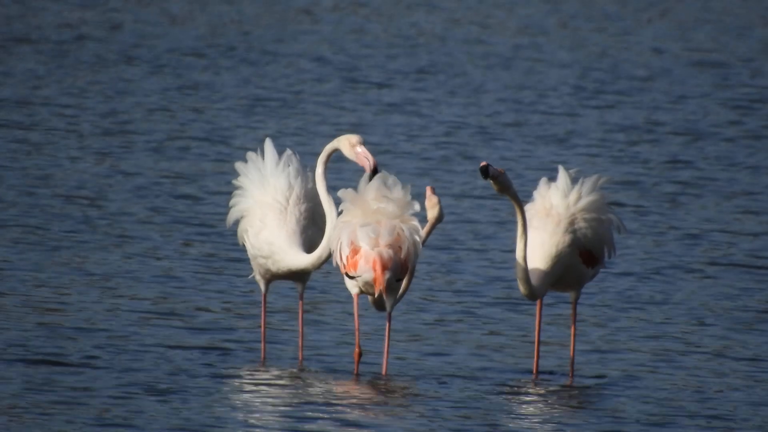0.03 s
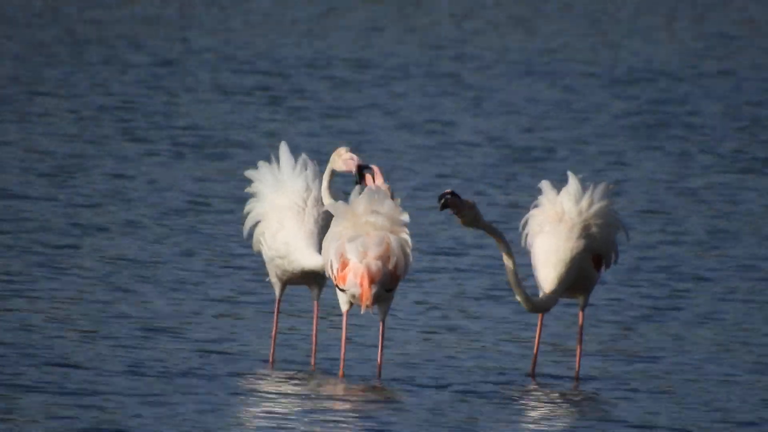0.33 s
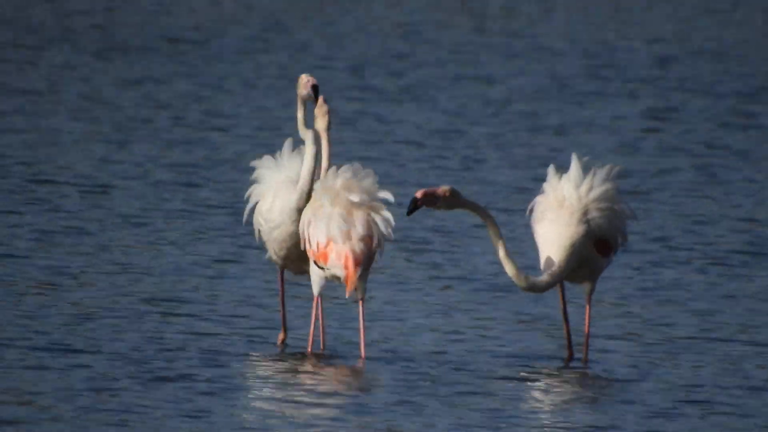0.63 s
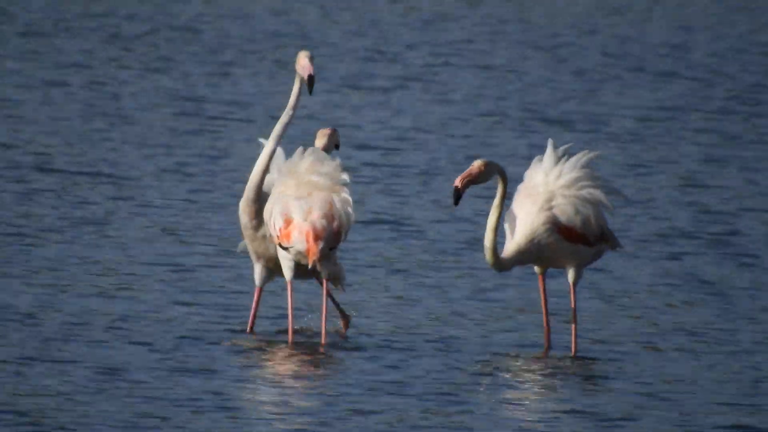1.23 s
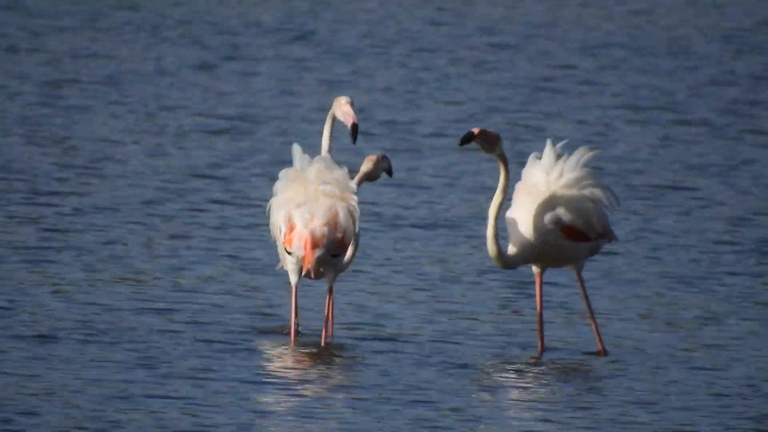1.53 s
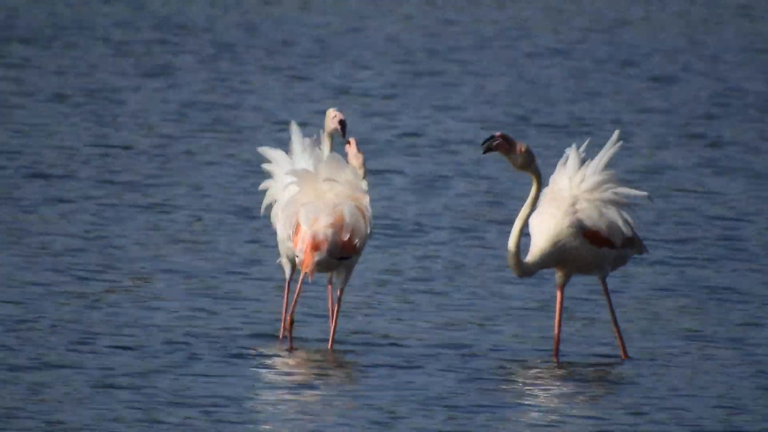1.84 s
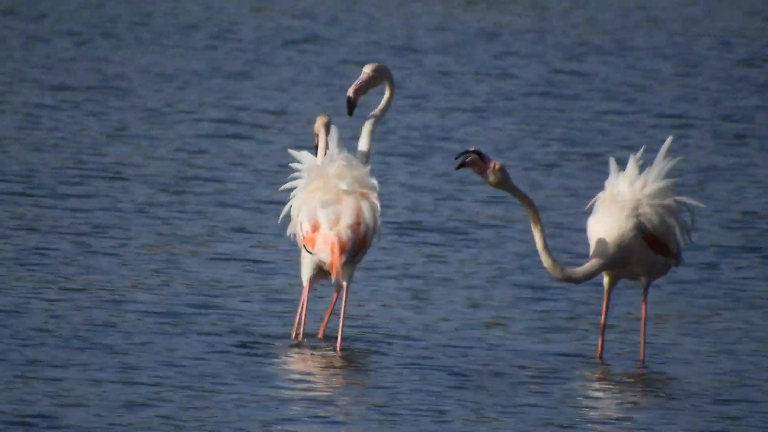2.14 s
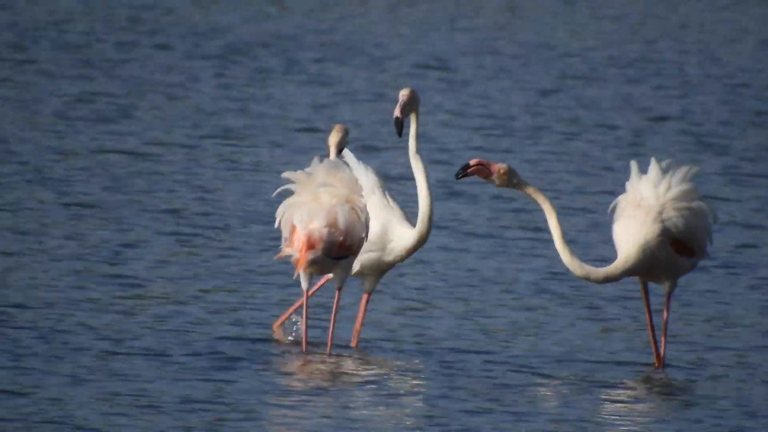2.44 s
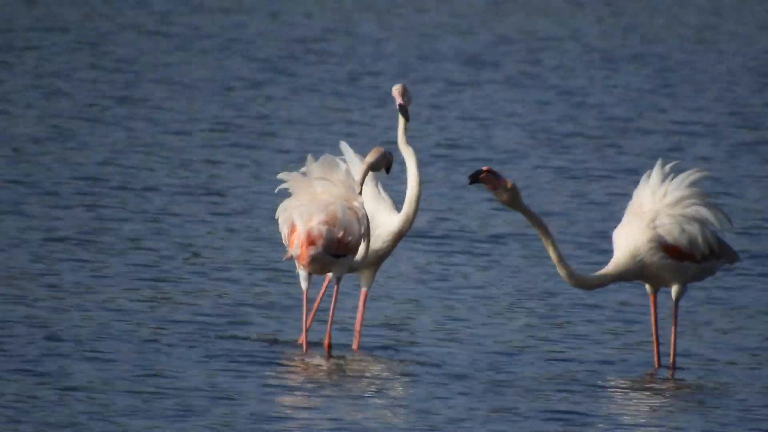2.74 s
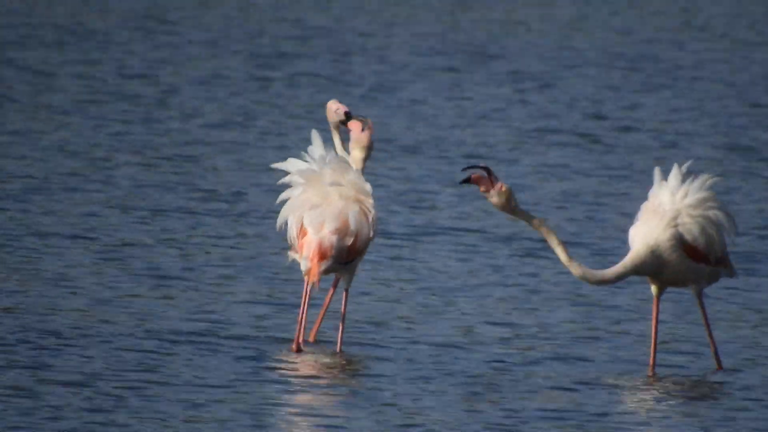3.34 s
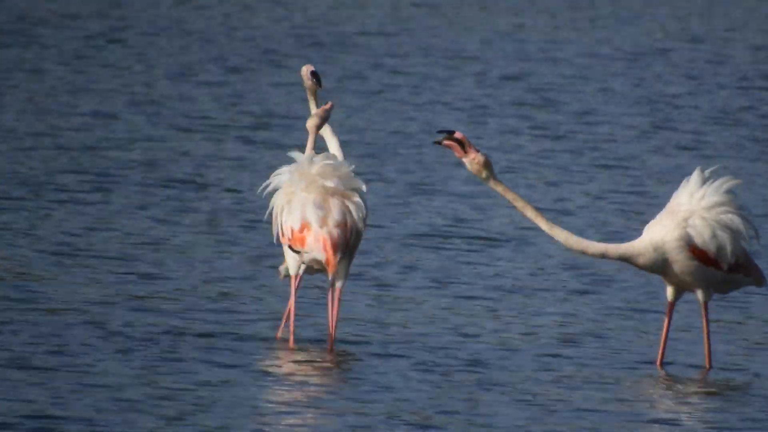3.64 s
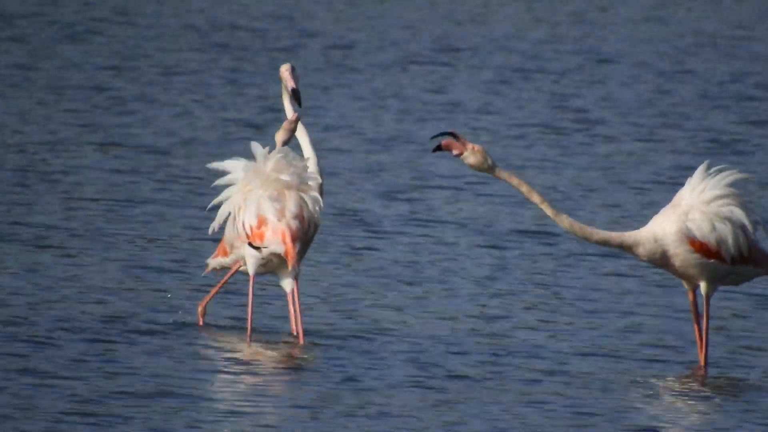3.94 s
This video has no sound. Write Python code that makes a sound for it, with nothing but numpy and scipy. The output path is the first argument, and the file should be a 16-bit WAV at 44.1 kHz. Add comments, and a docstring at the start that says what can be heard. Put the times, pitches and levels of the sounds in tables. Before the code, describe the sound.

Harsh, overlapping flamingo honks run throughout, with a nasal bray at first and a buzzing growl later, then a faint, distant bird whistle. Shallow water washes softly while low wind rumbles on the microphone.

```python
"""Flamingos squabbling in a lagoon

Each honk is a short train of raspy air puffs exciting the resonances of the throat. A nasal bray
comes early in the quarrel, and one bird later holds a long, buzzing growl. A small bird whistles
far off. Low wind bumps the microphone over a soft wash of shallow water."""
import sys
import numpy as np
from scipy import signal
from scipy.fft import rfft, irfft, next_fast_len
from scipy.io import wavfile
from scipy.ndimage import map_coordinates

SR = 44100
rng = np.random.default_rng(int(sys.argv[2]) if len(sys.argv) > 2 else 0)


def bounce(signal):
    """Save signal as a 16-bit WAV file at the path given by the first command-line argument."""
    frames = np.transpose(np.atleast_2d(signal))
    limited = np.clip(frames, -1, 1)
    pcm = np.round(limited * 32767).astype(np.int16)
    wavfile.write(sys.argv[1], SR, pcm)


N = 176400
T = np.arange(N) / SR

# Each row: centre of a honk in seconds, length in seconds, puffs per second, first, second and rasp
# resonance in Hz, then relative levels in dB of the first, second, third, rasp and hiss bands.
HONK_CALLS = [(0.109, 0.084, 77, 1173, 2400, 4440, -45.5, -60, -57, -60, -50),
              (0.174, 0.16, 72.75, 1040, 2020, 3700, -47.5, -58.5, -70, -59.5, -65),
              (0.391, 0.028, 77, 1160, 2540, 5100, -55.5, -58.5, -69, -79, -78),
              (0.528, 0.14, 86.6, 1045, 2147, 3900, -48, -56.5, -62.5, -63, -61),
              (0.624, 0.083, 88, 1145, 2120, 4040, -52, -59, -69, -78, -73),
              (0.761, 0.075, 73.4, 1037, 2160, 4920, -48.5, -54.5, -54, -56.5, -59.5),
              (0.866, 0.13, 84.6, 1050, 1970, 4530, -46.5, -57, -65.5, -61, -64.5),
              (0.99, 0.092, 94.1, 1090, 2100, 5200, -55, -60, -75, -78, -76),
              (1.192, 0.11, 73.8, 1050, 2200, 4560, -43.5, -56, -54.5, -46.5, -55),
              (1.376, 0.057, 72.7, 1220, 2520, 3900, -54, -61, -53, -71, -76),
              (1.444, 0.099, 74.4, 1080, 2170, 4330, -44.5, -58, -68, -47.5, -56.5),
              (1.607, 0.12, 78.4, 1050, 1940, 4530, -50.5, -55.5, -65, -62.5, -65),
              (1.726, 0.1, 88.7, 1033, 2160, 4780, -45.5, -50, -63, -45, -54.5),
              (1.919, 0.077, 85.3, 1008, 2030, 3730, -49, -57, -62, -66, -59.5),
              (2.033, 0.135, 90.2, 1048, 2135, 4860, -43.5, -48.5, -56.5, -54.5, -56.5),
              (2.13, 0.1, 103.6, 1120, 2260, 4450, -49.5, -69, -72, -84, -81.5),
              (2.209, 0.13, 79, 1082, 1940, 4400, -45, -60, -62.5, -56, -56.5),
              (2.367, 0.14, 70.5, 1016, 2160, 5070, -52.5, -71, -70, -53.5, -54),
              (2.569, 0.11, 84.5, 1060, 2040, 4520, -44.5, -50, -60, -57, -57),
              (2.851, 0.084, 70.9, 1054, 2200, 4670, -49, -57, -65, -57, -57.5),
              (2.929, 0.09, 70.5, 1065, 2020, 3700, -52, -54, -65, -73, -63.5),
              (2.972, 0.12, 70.95, 1123, 1980, 3700, -49, -61, -56.5, -67, -63.5),
              (3.09, 0.087, 71.2, 1097, 2350, 4830, -50.5, -64, -59, -51.5, -53.5),
              (3.26, 0.1, 83.9, 1290, 2480, 4320, -48.5, -64, -57.5, -57, -59.5),
              (3.346, 0.086, 76.4, 1064, 2180, 4740, -46.5, -51.5, -56.5, -51.5, -53.5),
              (3.59, 0.12, 78, 1072, 2110, 4060, -46.5, -56, -56, -55, -53.5),
              (3.833, 0.13, 94, 1070, 2010, 4240, -43.5, -51.5, -58.5, -58, -57.5)]
# Clusters about the first and the rasp resonance. Each row: frequency ratio, width in Hz, gain in dB.
THROAT_MODES = [(0.92, 194, 16.5), (1.11, 265, 4), (1.33, 420, -7.5)]
RASP_MODES = [(.85, 704, 2), (1.01, 1090, 8.5), (1.24, 720, -2)]
# Stationary resonances of the calls. Each row: centre in Hz, width in Hz, gain in dB.
HISS_MODES = [(5870, 680, -5.5), (6950, 1150, 4.5), (8280, 1830, -1), (9800, 2400, -19)]
BRAY_THROAT_MODES = [(950, 300, -12.5), (1187, 230, 0.5), (1950, 88, -13.5), (2350, 470, -12.5),
                     (2910, 300, -14)]
BRAY_BILL_MODES = [(4330, 670, -3), (5580, 550, 1), (6950, 800, 0.5), (8730, 2000, -5.5)]
GROWL_THROAT_MODES = [(956, 270, -1), (1290, 360, -1.5), (1470, 94, -9)]
GROWL_BUZZ_MODES = [(4570, 670, -0.5), (3920, 1300, -14)]
# Envelopes of the bray. Each row: time in seconds, throat level in dB, bill level in dB.
BRAY_ENVELOPE = [(.208, -50, -69), (.225, -43.5, -54), (.275, -42.5, -47.5), (.318, -44.5, -46.5),
                 (.342, -49, -56)]
# Envelopes of the growl, its buzz and the wind. Each row: time in seconds, relative level in dB.
GROWL_ENVELOPE = [(3.111, -42), (3.19, -39.5), (3.25, -37.5), (3.31, -37), (3.39, -40.5), (3.46, -37.5),
                  (3.515, -42.5), (3.58, -40)]
BUZZ_ENVELOPE = [(3.12, -5), (3.26, -3.5), (3.42, 1.5), (3.515, 3), (3.535, -11)]
WIND_ENVELOPE = [(.1, -47), (.8, -47), (1.3, -45.5), (1.65, -45.5), (1.9, -47), (2.35, -46), (2.8, -48),
                 (4, -48.3)]
# The small bird. Each row: start in seconds, length in seconds, first and last pitch in Hz, level in dB.
WHISTLE_NOTES = [(3.629, 0.074, 4400, 4130, -60), (3.769, 0.055, 4170, 3760, -51.5)]
# Wind buffets. Each row: centre and half length in seconds, frequency in Hz, relative level in dB.
WIND_BUMPS = [(0.478, 0.022, 54.7, -36), (1.015, 0.021, 68, -36.5), (1.265, 0.023, 131, -32.5),
              (1.281, 0.043, 64.5, -36.5), (1.534, 0.014, 56, -32), (1.637, 0.021, 69, -34),
              (2.345, 0.015, 68, -34)]
# Water stirred by legs. Each row: centre and half length in seconds, level in dB.
WADING_SLOSHES = [(.63, 0.08, -52.5)]
# Noise spectra. Each row: frequency in Hz, relative level in dB.
WIND_SPECTRUM = [(20, 2.5), (35, -5.5), (65, 1), (100, -1.5), (150, -5), (205, -5), (260, -31.5),
                 (400, -28), (900, -73)]
WATER_SPECTRUM = [(100, 9.5), (260, 3), (500, 1), (800, -0.5), (1400, -2.5), (2200, -5.5), (3200, -8),
                  (4800, -6), (7000, -9.5), (9000, -9.5), (11000, -15.5), (15500, -19)]
# Likeness of left and right. Each row: frequency in Hz, correlation.
WIND_COHERENCE = [(30, 1), (100, 0.95), (220, 0.78)]
WATER_COHERENCE = [(200, 0.56), (1000, 0.5), (4000, 0.1), (12000, 0.033)]

PUFF_SAMPLES, SCATTER_DB = 1024, 1.35  # scatter is the random spread of puff strength
THROAT_DECAY_S, RASP_DECAY_S, HISS_DECAY_S = .0048, .0024, .002
EASY_JITTER_S, FORCED_JITTER_S = .00007, .00022  # spread of puff timing at low and at full effort
EASY_NOISE, FORCED_NOISE = .16, .28  # turbulent share of the energy driving the throat


def honk(t, length, rate, first_hz, second_hz, rasp_hz, levels_db):
    """Source and filter: puffs around t = 0 ring the throat, which sags and roughens with effort."""
    index = np.arange(-9, 10)
    jitter, scatter, edge, waver, accent, twang, stumble = rng.standard_normal((7, len(index)))
    effort = np.interp(levels_db[0], (-48.5, -44), (0, 1))
    noise = np.interp(effort, (0, 1), (EASY_NOISE, FORCED_NOISE))
    times = index / rate * (1 + .45 * effort * index / rate)  # effort slows the puffs as they go
    times += np.interp(effort, (0, 1), (EASY_JITTER_S, FORCED_JITTER_S)) * jitter
    when, starts = times[:, None], times - t[0]

    def swell(lag_s, edge_db, shape):
        """Puff amplitudes peak at lag_s and fall by edge_db half a length away."""
        fall_db = edge_db * np.abs(2 * (times - lag_s) / length) ** shape
        return amp(np.maximum(SCATTER_DB * scatter - fall_db, -120))

    drift = .014 * waver[:, None]
    first = first_hz * np.exp(drift - 1.5 * effort * when)
    second = second_hz * np.exp(drift - .45 * effort * when)
    rasp = rasp_hz * np.exp(2.4 * np.minimum(when + .0082, 0))  # climbs as the bill opens
    throat_modes = [(first * ratio, width, db) for ratio, width, db in THROAT_MODES]
    rasp_modes = [(rasp * ratio, width, db) for ratio, width, db in RASP_MODES]
    overtones = swell(lag_s=-.0054, edge_db=20.5, shape=3.04)
    first_puffs = with_after_snaps(starts - .003, swell(-.004, 15.5, 2.9), stumble)
    second_puffs = with_after_snaps(starts - .002, amp(SCATTER_DB * accent) * overtones, stumble)
    # Rasp and hiss puffs are more uneven, and lengthen as they sink under the first band.
    bite = amp(3 * edge)
    blur = 1.48 + .7 * np.clip((levels_db[0] - max(levels_db[3:])) / 14, 0, 1)
    bands = [  # first, second, third, rasp, hiss
        (*first_puffs, throat_modes, THROAT_DECAY_S, noise),
        (*second_puffs, [(second, 380, 0)], THROAT_DECAY_S, noise),
        (starts - .0008, amp(SCATTER_DB * twang) * overtones, [(2857, 700, 0)], .004, 3 * noise),
        (starts - .0003, bite * swell(.002, 16.5, 1.9), rasp_modes, blur * RASP_DECAY_S, .92),
        (starts, bite * swell(.0064, 19, 1.9), HISS_MODES, blur * HISS_DECAY_S, .75)]
    voice = sum(amp(db) * puff_train(*band, samples=len(t)) for db, band in zip(levels_db, bands))
    return voice * np.sqrt(length * SR / len(t))


def honks():
    """Superposition: the overlapping honks of the flock add."""
    flock = np.zeros(N)
    for centre, length, rate, first_hz, second_hz, rasp_hz, *levels_db in HONK_CALLS:
        near = np.abs(T - centre) < .12
        flock[near] += honk(T[near] - centre, length, rate, first_hz, second_hz, rasp_hz, levels_db)
    return amp(.2) * flock


def with_after_snaps(starts, sizes, stumble, delay_s=.0045, jitter_s=.0005):
    """Double pulsing: a weaker, less punctual snap follows each puff of the throat."""
    return np.r_[starts, starts + delay_s + jitter_s * stumble], np.r_[sizes, amp(-5) * sizes]


def puff_train(starts, sizes, modes, decay_s, noise_share, samples=N):
    """Impulse excitation: each puff, a snap plus turbulence, rings the modes. The train has rms 1."""
    t = np.arange(PUFF_SAMPLES) / SR - .006
    envelope = np.where(t < 0, np.exp(-(t / decay_s) ** 2), np.exp(-np.abs(t) / decay_s))
    turbulence = unit(envelope * rng.standard_normal((len(starts), PUFF_SAMPLES)))
    snap = unit(signal.unit_impulse(PUFF_SAMPLES, np.argmin(np.abs(t))))
    drive = rfft(np.sqrt(noise_share) * turbulence + np.sqrt(1 - noise_share) * snap)
    puffs = irfft(drive * np.resize(resonances(modes), drive.shape))
    puffs *= (sizes / np.linalg.norm(puffs, axis=1))[:, None]
    onsets = np.round((starts[:, None] + t[0]) * SR).astype(int)
    positions = np.clip(onsets + np.arange(PUFF_SAMPLES), 0, samples)
    return unit(np.bincount(positions.ravel(), puffs.ravel(), samples + 1)[:samples])


def resonances(modes):
    """Steep parallel resonators, given minimum phase so that ringing follows its cause."""
    f = np.fft.rfftfreq(PUFF_SAMPLES, 1 / SR)
    gain = sum(amp(db) * (f * width / np.hypot(hz * hz - f * f, f * width)) ** 3
               for hz, width, db in modes)
    cepstrum = irfft(np.log(gain + 1e-3))
    lag = np.arange(PUFF_SAMPLES)
    causal_fold = np.where(lag < PUFF_SAMPLES // 2, 2 - (lag == 0), 0)
    return np.exp(rfft(cepstrum * causal_fold))


def bray(puff_hz=103.6):
    """Periodic excitation: even puffs voice a nasal call, which brightens as the opening bill rings."""
    knots, throat_db, bill_db = np.transpose(BRAY_ENVELOPE)
    times = np.arange(knots[0], knots[-1], 1 / puff_hz)
    jitter, scatter = rng.standard_normal((len(times), 2)).T
    times += EASY_JITTER_S * jitter
    sizes = amp(SCATTER_DB * scatter)
    throat = puff_train(times - .003, sizes, BRAY_THROAT_MODES, THROAT_DECAY_S, FORCED_NOISE)
    bill = puff_train(times, sizes, BRAY_BILL_MODES, HISS_DECAY_S, noise_share=.8)
    voice = amp(np.interp(T, knots, throat_db)) * throat + amp(np.interp(T, knots, bill_db)) * bill
    return voice * np.sqrt((knots[-1] - knots[0]) * SR / N)


def growl(cycle_hz=67.75, gap_s=.0047, jitter_s=.00014):
    """Grouped pulses: three snaps a cycle, the first two buzzing, the last two throaty."""
    knots, db = np.transpose(GROWL_ENVELOPE)
    cycles = np.arange(knots[0], knots[-1], 1 / cycle_hz)
    times = (cycles[:, None] + gap_s * np.arange(3)).ravel()
    jitter, scatter = rng.standard_normal((len(times), 2)).T
    times += jitter_s * jitter
    accents = np.tile([[.5, 1, .8], [.8, 1, .25]], len(cycles))
    throat_sizes, buzz_sizes = amp(SCATTER_DB * scatter) * accents
    throat = puff_train(times, throat_sizes, GROWL_THROAT_MODES, RASP_DECAY_S, noise_share=.4)
    buzz = puff_train(times, buzz_sizes, GROWL_BUZZ_MODES, decay_s=.0008, noise_share=.4)
    buzz *= amp(np.interp(T, *np.transpose(BUZZ_ENVELOPE)))
    level = amp(np.interp(T, knots, db) - 10.5) * np.sqrt((knots[-1] - knots[0]) * SR / N)
    return level * (throat + buzz)


def far_whistle():
    """Frequency modulation: a small bird's thin tones waver as they glide down."""
    notes = np.zeros(N)
    for start, length, from_hz, to_hz, db in WHISTLE_NOTES:
        progress = np.clip((T - start) / length, 0, 1)
        hz = from_hz + (to_hz - from_hz) * progress + 90 * wobble(500)
        envelope = amp(db) * np.sqrt(np.abs(np.sin(np.pi * progress)))
        notes += envelope * np.sin(2 * np.pi * np.cumsum(hz) / SR)
    return notes


def lagoon(voices, tail_s=.09, wet_db=-14, spacing_s=.000653):
    """Scattering off ripples adds a short tail; phase differences spread the voices, the treble most."""
    t = T[:SR // 2]
    tail = rng.standard_normal((2, len(t))) * amp(-60 * t / tail_s)
    wet = signal.fftconvolve(voices[None], tail / np.linalg.norm(tail[0]), axes=1)[:, :N]
    wet = filtered(wet, lambda f: amp(wet_db + along([(1500, 0), (7000, -3)], f)))
    spread_db = [(1000, -30), (4000, -8), (8000, -2.5)]
    side = filtered(voices, lambda f: 1j * np.sin(2 * np.pi * f * spacing_s) * amp(along(spread_db, f)))
    return voices * amp([[1], [-1]]) + np.array([side, -side]) + wet


def wind():
    """Pressure fluctuations of wind on the microphone: a rumble and short bumps, stronger on the left."""
    level = amp(np.interp(T, *np.transpose(WIND_ENVELOPE)) + 2 + wobble(16))
    rumble = level * stereo_noise(WIND_SPECTRUM, WIND_COHERENCE)
    bumps = np.zeros((2, N))
    for centre, half_s, hz, db in WIND_BUMPS:
        phase = 2 * np.pi * hz * (T - centre) + rng.uniform(0, 2 * np.pi)
        waver = 1.2 * np.array([wobble(100), wobble(80)])
        bumps += bell_curve(centre, half_s, db) * np.sin(phase + waver)
    return rumble * amp([[1.7], [-2]]) + bumps * amp([[5], [-2]])


def water():
    """Modulated noise: ripples merge into a broadband wash, and wading legs stir a narrow-band slosh."""
    wash = amp(-50.5 + .6 * wobble(23.81)) * stereo_noise(WATER_SPECTRUM, WATER_COHERENCE)
    stir = sum(bell_curve(*row) for row in WADING_SLOSHES) * amp(2.5 * wobble(70.3))
    slosh = stereo_noise([(200, -17), (420, -6), (560, 1), (800, -6), (2000, -38)], [(500, .88)])
    return wash + stir * slosh


def stereo_noise(spectrum, coherence):
    """Partly coherent noise of rms 1: the balance of mid and side sets the correlation."""
    def response(f):
        angle = np.arccos(along(coherence, f)) / 2
        return amp(along(spectrum, f)) * np.array([np.cos(angle), np.sin(angle)])
    mid, side = filtered(rng.standard_normal((2, N)), response)
    return unit(np.array([mid + side, mid - side]))


def bell_curve(centre, half_s, db):
    """A Gaussian envelope."""
    return amp(db) * np.exp(-((T - centre) / half_s) ** 2)


def wobble(rate):
    """A smooth random curve with rate knots a second."""
    return map_coordinates(rng.standard_normal(int(N * rate / SR) + 4), [T * rate])


def filtered(x, response):
    """Linear filtering: the spectrum of x times a function of frequency."""
    n = x.shape[-1]
    padded = next_fast_len(n + 4096)
    return irfft(rfft(x, padded) * response(np.fft.rfftfreq(padded, 1 / SR)), padded)[..., :n]


def along(points, hz):
    """Interpolation of (Hz, value) points on a logarithmic frequency axis."""
    f, values = np.transpose(points)
    return np.interp(np.log(hz + 1), np.log(f + 1), values)


def amp(db):
    """Decibels to amplitude ratio."""
    return 10 ** (np.asarray(db) / 20)


def unit(x):
    """Normalisation to rms 1."""
    return x / np.sqrt(np.mean(x ** 2) + 1e-20)


def scene():
    """Superposition of the birds in the lagoon, the wind and the water."""
    return lagoon(honks() + bray() + growl() + far_whistle()) + wind() + water()


def record(dry, start_s=.087, fade_s=.014, top_hz=15750):
    """Gating and band limiting: the sound fades in after a brief silence, with nothing above top_hz."""
    return filtered(dry * np.clip((T - start_s) / fade_s, 0, 1), lambda f: f < top_hz)


dry = scene()
out = record(dry)
bounce(out)
```